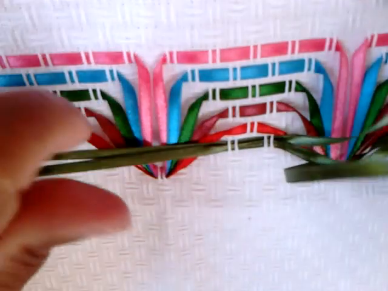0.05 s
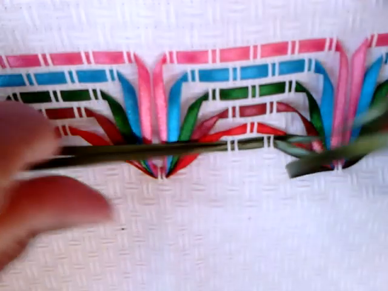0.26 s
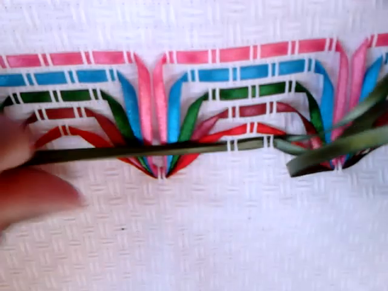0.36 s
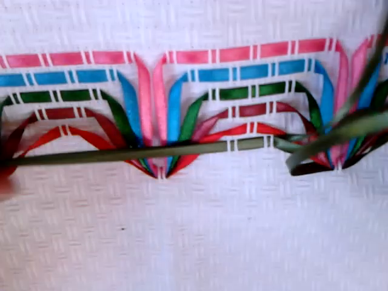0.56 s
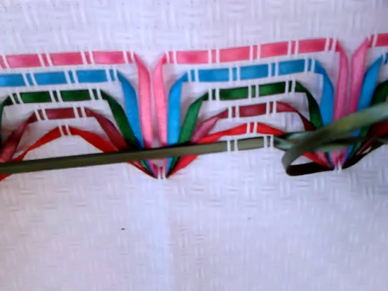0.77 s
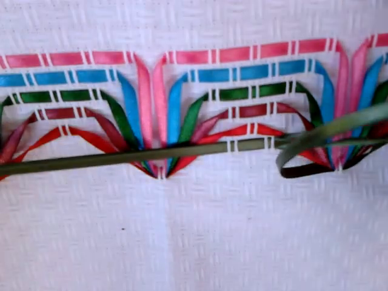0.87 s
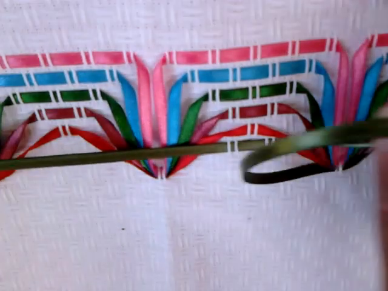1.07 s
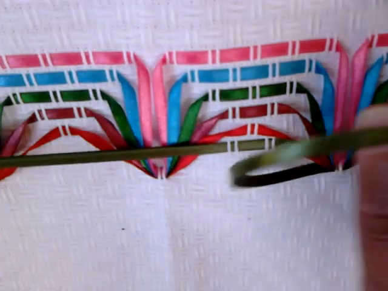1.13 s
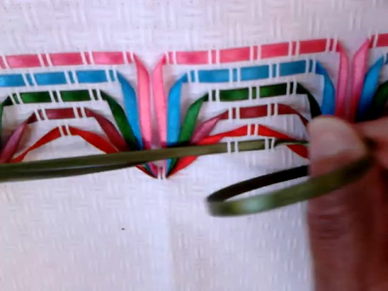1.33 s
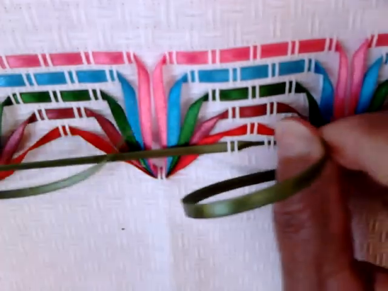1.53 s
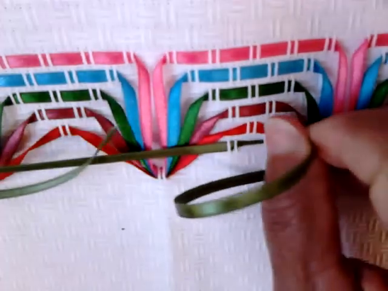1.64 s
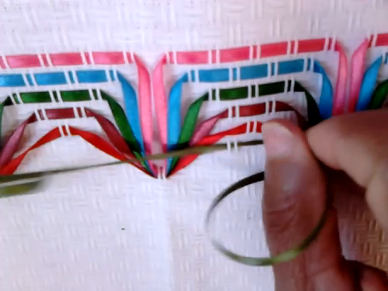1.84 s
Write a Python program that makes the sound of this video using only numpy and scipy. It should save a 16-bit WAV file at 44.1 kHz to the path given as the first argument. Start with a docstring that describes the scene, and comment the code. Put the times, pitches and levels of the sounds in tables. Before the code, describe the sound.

Ribbon dragged jerkily under cloth threads, crisp scraping and ticks over low fabric drumming, then soft bumps

```python
"""Close by in a quiet room with a faint rumble and hum, fingers softly bump a taut woven cloth.
A satin ribbon is then pulled under its threads: noise of tiny slips crackles, snagging edges tick and chirp,
and the stretched cloth drums in its resonant modes.
After the pull come more bumps, and the loose ribbon flicks against the cloth twice."""
import sys
import numpy as np
from scipy import signal
from scipy.fft import rfft, irfft, next_fast_len
from scipy.io import wavfile
from scipy.ndimage import uniform_filter1d, map_coordinates

SR = 44100
rng = np.random.default_rng(int(sys.argv[2]) if len(sys.argv) > 2 else 0)


def file_out(sig):
    """Save sig as 16-bit WAV at sys.argv[1]."""
    # one column per channel
    cols = np.atleast_2d(sig).T
    # limit, then scale
    lim = np.clip(cols, -1, 1)
    pcm = np.round(lim * 32767).astype(np.int16)
    wavfile.write(sys.argv[1], SR, pcm)


N = 83790

# Background noise spectrum. Each row: frequency in Hz, level in dB.
ROOM_COLOUR = [(20, -27.5), (45, -12.5), (62, -9.5), (85, -11), (130, -3.5), (190, -0.5), (260, -17),
               (370, -11.5), (600, -19), (1100, -23.5), (3000, -26), (7000, -28), (9500, -25.5),
               (14000, -30.5)]
# Stereo width. Each row: frequency in Hz, side over mid in dB.
STEREO_WIDTH = [(3100, -70), (4200, -39), (5500, -11.5), (9000, -4), (14000, -9)]
# Modes of the stretched cloth. Each row: frequency in Hz, width in Hz untouched, level in dB.
CLOTH_MODES = [(63.2, 3.1, 14.5), (88.5, 7.9, -2.5), (115.5, 5, 7.5), (128.2, 3.7, 13), (151, 4.4, 2.5),
               (187.8, 5.1, 6.5), (227.5, 3.3, -5), (251, 4, -20.5), (306.8, 3.2, -10), (345, 4.9, -11.5),
               (372, 3, -25)]
# Finger bumps. Each row: start in seconds, thump in dB, push length in seconds, brush in dB, rub in dB.
BUMPS = [(.002, -48.5, 0.0027, -64, -63), (.098, -50.5, 0.0017, -68.5, -64),
         (.145, -45.5, 0.0087, -77, -69), (0.929, -50, 0.014, -62.5, -72),
         (1.039, -37.5, 0.0074, -50.5, -58.5), (1.083, -45.5, 0.0081, -60, -64),
         (1.159, -46.5, 0.0048, -62.5, -66), (1.528, -55, 0.012, -78, -67.5),
         (1.567, -52.5, .005, -73, -80), (1.642, -43.5, 0.012, -66, -57.5), (1.67, -47.5, 0.0011, -94, -95),
         (1.783, -55.5, 0.0042, -101, -75)]
# Fingers brushing the weave. Each row: frequency in Hz, level in dB.
BRUSH_COLOUR = [(2000, -10.5), (3300, -7), (5500, -0.5), (7500, -2.5), (9600, 1.5), (11500, -6),
                (14200, -7.5)]
# Duller rub of the fingers. Each row: frequency in Hz, level in dB.
RUB_COLOUR = [(90, -2), (220, 0.5), (370, 2), (550, -4.5), (1000, -6), (1500, -15), (2200, -13),
              (4500, -21)]
# Loose ribbon flicks. Each row: start in seconds, click in dB, patter in dB, slap in dB, thump in dB,
# push length in seconds, rebound in dB.
FLICKS = [(1.371, -34, -43, -47.5, -48, 0.0049, -53), (1.8296, -37.5, -52.5, -64, -50.5, 0.0013, -85)]
# Click of a flick. Each row: frequency in Hz, level in dB.
CLICK_COLOUR = [(2000, -24), (4000, -19), (6000, -15.5), (7500, -9), (9000, 2.5), (10300, -1.5),
                (11500, -4.5), (14200, -13)]
# Slap of a flick. Each row: frequency in Hz, level in dB.
SLAP_COLOUR = [(150, -19), (550, 3), (900, -9), (1200, -9), (1900, -4.5), (2500, -18), (3200, -5),
               (3800, 4.5), (4400, -2.5), (7000, -17), (14000, -18)]
# Ribbon edge snagging on a thread. Each row: start in seconds, tick peak in dB, tick frequency in Hz,
# ribbon ring in dB.
SNAGS = [(.1477, -29, 9500, -45), (.1583, -36, 9500, -49), (.1630, -35, 9500, -47), (.2026, -25, 9600, -43),
         (.2115, -25, 9500, -45), (.2420, -29, 9200, -45), (.2555, -31, 9300, -45), (.2626, -28, 9800, -44),
         (.2742, -29, 9500, -44), (.2907, -17, 9900, -37), (.3150, -32, 9000, -38), (.3504, -18, 9000, -35),
         (.3608, -30, 9200, -52), (.3642, -26, 8800, -39), (.3815, -29, 9500, -44), (.3903, -30, 9400, -44),
         (.4120, -28, 9000, -40), (.4781, -31, 9400, -43), (.5070, -32, 9500, -43), (.5357, -36, 9200, -40),
         (.5665, -36, 9000, -38), (.5912, -30, 9000, -36), (.6115, -29, 9300, -34), (.6348, -26, 9500, -31),
         (.6847, -24, 9700, -38), (.7061, -12, 9900, -36), (.7240, -32, 9000, -38), (.7435, -24, 9500, -50),
         (.7750, -26, 9300, -39), (.8676, -33, 9600, -52)]
# Ribbon pull. Each row: time in seconds, thread slips in dB, ribbon rasp in dB.
PULL = [(.135, -81, -98), (.16, -45.5, -59.5), (.192, -82, -74), (.225, -51, -57), (.27, -41, -59.5),
        (.335, -47, -56.5), (.375, -49, -52.5), (.403, -57, -68), (.44, -42.5, -53), (.47, -63.5, -71),
        (.52, -38.5, -51), (.575, -45.5, -47), (.615, -36.5, -41), (.67, -39, -47.5), (.748, -38, -49.5),
        (.785, -36, -45.5), (.85, -40.5, -55.5), (.89, -53, -67), (.98, -83, -90), (1.03, -118, -100)]
# Drag on the cloth. Each row: time in seconds, slack low modes in dB, taut modes in dB, scrape in dB.
DRAG = [(.13, -95.5, -103, -99), (.152, -48.5, -54.5, -72), (.19, -58, -65, -78), (.225, -49.5, -51.5, -55),
        (.285, -43.5, -46.5, -59), (.33, -44, -49.5, -56.5), (.40, -50.5, -60, -63),
        (.435, -49, -48.5, -58), (.47, -58, -61.5, -63.5), (.545, -40.5, -44, -51.5),
        (.61, -51.5, -49, -47), (.68, -46.5, -47, -48.5), (.745, -47, -69, -52.5), (.78, -44, -56, -51.5),
        (.85, -47.5, -50, -50.5), (.89, -47.5, -50.5, -65.5), (.95, -76, -83, -72.5),
        (1.03, -87.5, -87, -108)]
# Threads slipping over satin. Each row: frequency in Hz, level in dB.
SLIP_COLOUR = [(2000, -67), (3500, -55.5), (5200, -13), (6400, -12), (7200, -5.5), (8000, -4.5), (9300, 1),
               (10400, -2.5), (11500, -6), (12700, -11.5), (14200, -10)]
# Ribbon rasp and ring. Each row: frequency in Hz, level in dB.
RASP_COLOUR = [(1500, -19), (2700, -15.5), (3300, 3.5), (3800, -1.5), (4400, 5), (5200, -4), (6500, -4.5),
               (10000, -20)]
# Cloth scrape. Each row: frequency in Hz, level in dB.
SCRAPE_COLOUR = [(200, -39), (350, -13.5), (450, -12.5), (580, 7.5), (700, -12.5), (980, 9.5), (1200, -9),
                 (1420, -9.5), (1590, -0.5), (1730, -5.5), (1950, 4.5), (2300, -8.5), (2900, -2),
                 (4500, -8.5)]

ROOM_DB, HUM_HZ, HUM_DB = -68, 62, -71
WALL_T60_S, WALL_DB = 0.28, -9.5
BAND_LIMIT_HZ = 14300
FINGER_DAMPING = 5.6  # a touching finger widens the modes by this factor
BRUSH_RISE_S, BRUSH_T60_S = 0.0023, 0.14
CLICK_T60_S, PATTER_T60_S, SLAP_T60_S = 0.013, 0.1, 0.086
REBOUND_DELAY_S, REBOUND_HZ, REBOUND_T60_S = 0.016, 1580, 0.035
TICK_RISE_S, TICK_T60_S = 0.0002, 0.003  # the rise also serves the other sharp onsets
CRACK_DB, CRACK_T60_S = -11, 0.01  # level over the tick
RING_DELAY_S, RING_T60_S = 0.00048, 0.015
# Bending waves: the highs arrive first. Nominal pitches; level over the ring.
CHIRP_FROM_HZ, CHIRP_TO_HZ, CHIRP_GLIDE_S = 7580, 3990, 0.000767
CHIRP_T60_S, CHIRP_DB = 0.013, -3
CATCHES_PER_S, CATCH_SPREAD_DB, CATCH_DB = 130, 5.5, -6.5  # level over the rasp
SLIPS_PER_S, SLIP_SPREAD_DB, SLIP_FLUTTER_DB = 3000, 4, 1.5
RASPS_PER_S, RASP_SPREAD_DB, RASP_FLUTTER_DB = 1300, 1.5, 1.6
JERK_DB, JERKS_PER_S = 1.3, 130


def amp(db):
    """Decibels to gain."""
    return 10 ** (np.asarray(db) / 20)


def unit(x):
    """Scale to rms 1."""
    return x / np.sqrt(np.mean(x ** 2) + 1e-20)


def along(points, hz):
    """Interpolate (Hz, value) points on a log axis."""
    point_hz, value = np.transpose(points)
    return np.interp(np.log(hz + 1), np.log(point_hz + 1), value)


def gains(rows):
    """One gain per sample for each dB column after the time."""
    time_s, *columns_db = np.transpose(rows)
    t = np.arange(N) / SR
    return [amp(np.interp(t, time_s, db)) for db in columns_db]


def wobble(knots_per_s):
    """A smooth random curve through random knots."""
    knots = rng.standard_normal(2048)
    return map_coordinates(knots, [np.arange(N) * knots_per_s / SR], mode="wrap")


def filtered(x, response):
    """Multiply the spectrum of x by a response of frequency."""
    n = x.shape[-1]
    m = next_fast_len(n + SR // 4)
    return irfft(rfft(x, m) * response(np.fft.rfftfreq(m, 1 / SR)), m)[..., :n]


def stereo(pair, colour):
    """Colour a mid and a side signal into left and right: mono bass, wider treble, mid rms 1."""
    def response(hz):
        side_gain = amp(along(STEREO_WIDTH, hz))
        return amp(along(colour, hz)) * np.array([np.ones_like(hz), side_gain])

    mid, side = filtered(pair, response)
    return np.array([mid + side, mid - side]) / np.std(mid)


def strike(rise_s, t60_s):
    """A quick rise and an exponential decay, peak 1."""
    t = np.arange(SR // 4) / SR
    shape = (1 - np.exp(-(t / rise_s) ** 2)) * amp(-60 * t / t60_s)
    return shape / shape.max()


def burst(colour, rise_s, t60_s):
    """A dying puff of coloured noise, its rms set to that of its envelope."""
    shape = strike(rise_s, t60_s)
    noise = stereo(rng.standard_normal((2, len(shape))), colour)
    return unit(noise * shape) * np.sqrt(np.mean(shape ** 2))


def add(out, start_s, sound):
    """Mix a sound in at its start time."""
    part = out[:, max(round(start_s * SR), 0):][:, :sound.shape[-1]]
    part += sound[..., :part.shape[1]]


def room():
    """Faint low rumble with a wavering hum, and faint noise above it of slightly uneven level."""
    t = np.arange(N) / SR
    hum = np.sin(2 * np.pi * HUM_HZ * t + 0.13 * wobble(18))
    noise = stereo(rng.standard_normal((2, N)), ROOM_COLOUR)
    rumble = filtered(noise, lambda hz: 1 / (1 + (hz / 500) ** 4))
    upper_noise = amp(1.8 * wobble(160)) * (noise - rumble)  # level varies by some dB
    return amp(ROOM_DB) * (rumble + upper_noise) + amp(HUM_DB) * hum


def walls(close):
    """Short diffuse reflections: the close sound convolved with dying noise."""
    tail = burst([(100, -0.5), (1000, -15), (14000, 13.5)], rise_s=.004, t60_s=WALL_T60_S)
    tail = tail / np.linalg.norm(tail[0])
    return amp(WALL_DB) * signal.fftconvolve(close, tail, axes=1)[:, :N]


def cloth(force, modes, damping=1):
    """A force rings the stretched cloth: a sum of damped resonators."""
    def response(hz):
        total = 0
        for mode_hz, width_hz, db in modes:
            loss = 1j * hz * width_hz
            total = total + amp(db) * loss / (mode_hz ** 2 - hz ** 2 + loss * damping)
        return total

    return filtered(force, response)


def thump(push_s, damping):
    """A soft push and release sets the cloth ringing, peak 1."""
    progress = np.minimum(np.arange(SR // 4) / SR / push_s, 1)
    ring = cloth(-np.sin(np.pi * progress) ** 2, CLOTH_MODES, damping)
    return ring / np.abs(ring).max()


def fingers():
    """Each touch thumps the finger-damped cloth and brushes its weave with noise."""
    out = np.zeros((2, N))
    for start_s, thump_db, push_s, brush_db, rub_db in BUMPS:
        add(out, start_s, amp(thump_db) * thump(push_s, FINGER_DAMPING))
        add(out, start_s, amp(brush_db) * burst(BRUSH_COLOUR, BRUSH_RISE_S, BRUSH_T60_S))
        add(out, start_s, amp(rub_db) * burst(RUB_COLOUR, BRUSH_RISE_S, BRUSH_T60_S))
    return out


def flicks():
    """The ribbon snaps against the cloth, rebounds with a small knock and patters to rest."""
    out = np.zeros((2, N))
    shape = strike(0.00067, REBOUND_T60_S)
    knock = shape * np.sin(2 * np.pi * REBOUND_HZ * np.arange(len(shape)) / SR)
    for start_s, click_db, patter_db, slap_db, thump_db, push_s, rebound_db in FLICKS:
        add(out, start_s, amp(click_db) * burst(CLICK_COLOUR, TICK_RISE_S, CLICK_T60_S))
        add(out, start_s, amp(patter_db) * burst(SLIP_COLOUR, TICK_RISE_S, PATTER_T60_S))
        add(out, start_s, amp(slap_db) * burst(SLAP_COLOUR, TICK_RISE_S, SLAP_T60_S))
        add(out, start_s, amp(thump_db) * thump(push_s, damping=1.35))
        add(out, start_s + REBOUND_DELAY_S, amp(rebound_db) * knock)
    return out


def chirp():
    """Bending waves along the ribbon: a dying sine whose pitch falls fast, scattered per snag."""
    shape = strike(0.00057, CHIRP_T60_S)
    fall = np.exp(-np.arange(len(shape)) / SR / CHIRP_GLIDE_S)
    glide_hz = CHIRP_TO_HZ + (CHIRP_FROM_HZ - CHIRP_TO_HZ) * fall
    glide_hz = glide_hz * np.exp(rng.normal(0, 0.077))
    return shape * np.sin(2 * np.pi * np.cumsum(glide_hz) / SR)


def snags():
    """A thread lets go with a bright tick, which chirps along the ribbon and leaves it ringing."""
    out = np.zeros((2, N))
    shape = strike(TICK_RISE_S, TICK_T60_S)
    t = np.arange(len(shape)) / SR
    ear_phase = np.array([[.45], [-.45]])  # rad, left and right
    for start_s, tick_db, tick_hz, ring_db in SNAGS:
        tick = shape * np.sin(2 * np.pi * tick_hz * t + rng.normal(0, .15) + ear_phase)
        crack = amp(CRACK_DB) * burst(SLIP_COLOUR, TICK_RISE_S, CRACK_T60_S)
        add(out, start_s, amp(tick_db) * (tick + crack))
        add(out, start_s, amp(ring_db + CHIRP_DB) * chirp())
        ring = burst(RASP_COLOUR, TICK_RISE_S, RING_T60_S)
        add(out, start_s + RING_DELAY_S, amp(ring_db) * ring)
    return out


def scattered_sizes(spread_db):
    """Random gains, one per sample, clipped at two deviations."""
    return amp(spread_db * np.clip(rng.standard_normal(N), -2, 2))


def catches():
    """Coarser threads catch at random as the ribbon slides; each rings as a brief noise burst."""
    _, rasp_gain = gains(PULL)
    hits = (rng.random(N) < CATCHES_PER_S / SR) * scattered_sizes(CATCH_SPREAD_DB)
    envelope = signal.fftconvolve(hits, strike(TICK_RISE_S, t60_s=0.025))[:N]
    noise = stereo(rng.standard_normal((2, N)), RASP_COLOUR)
    return rasp_gain * amp(CATCH_DB) * unit(envelope * noise)


def slips(rate_per_s, spread_db, colour):
    """Tiny stick-slip impulses of scattered size and random sign."""
    hits = (rng.random(N) < rate_per_s / SR) * scattered_sizes(spread_db)
    return stereo(hits * rng.choice([-1, 1], (2, N)), colour)


def drumming(modes):
    """Friction, as noise, keeps some of the cloth's modes ringing at an even strength."""
    ring = cloth(rng.standard_normal(N), modes)
    power = uniform_filter1d(ring ** 2, size=2000)
    return ring / np.sqrt(np.abs(power) + 1e-20)


def pull():
    """Jerky sliding friction: thread slips, coarser ribbon rasp, cloth scrape and drumming."""
    slip_gain, rasp_gain = gains(PULL)
    slack_gain, taut_gain, scrape_gain = gains(DRAG)
    slip_flutter = amp(SLIP_FLUTTER_DB * wobble(300))
    friction = slip_gain * slip_flutter * slips(SLIPS_PER_S, SLIP_SPREAD_DB, SLIP_COLOUR)
    rasp_flutter = amp(RASP_FLUTTER_DB * wobble(140))
    friction += rasp_gain * rasp_flutter * slips(RASPS_PER_S, RASP_SPREAD_DB, RASP_COLOUR)
    friction += scrape_gain * slips(rate_per_s=1500, spread_db=1.5, colour=SCRAPE_COLOUR)
    jerks = amp(JERK_DB * wobble(JERKS_PER_S))
    drum = slack_gain * drumming(CLOTH_MODES[:4]) + taut_gain * drumming(CLOTH_MODES[4:])
    return jerks * friction + drum


def scene():
    """The close sounds, a short answer from the walls, and the room."""
    close = pull() + catches() + snags() + fingers() + flicks()
    return close + walls(close) + room()


def record(dry):
    """A steep low-pass removes what lies above the band limit."""
    return filtered(dry, lambda hz: 1 / np.sqrt(1 + (hz / BAND_LIMIT_HZ) ** 300))


dry = scene()
out = record(dry)
file_out(out)
```